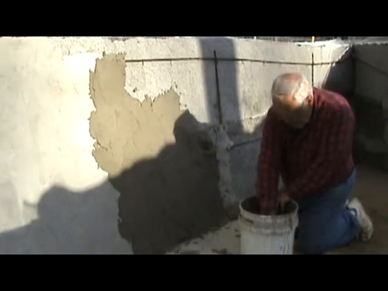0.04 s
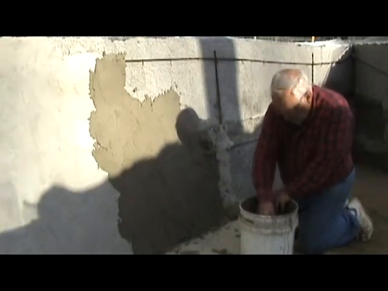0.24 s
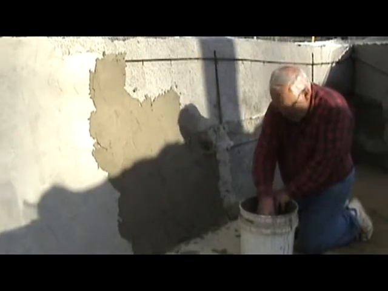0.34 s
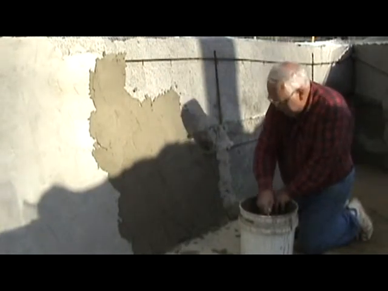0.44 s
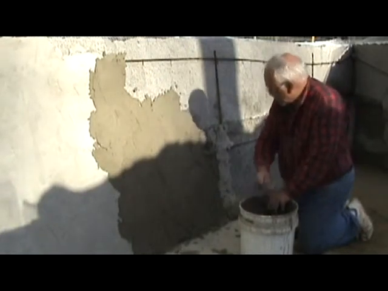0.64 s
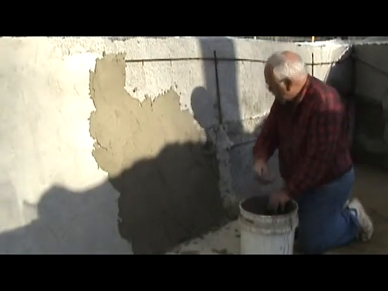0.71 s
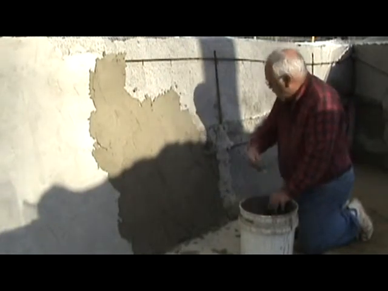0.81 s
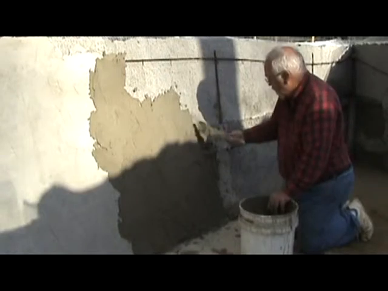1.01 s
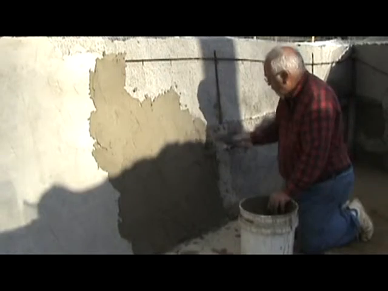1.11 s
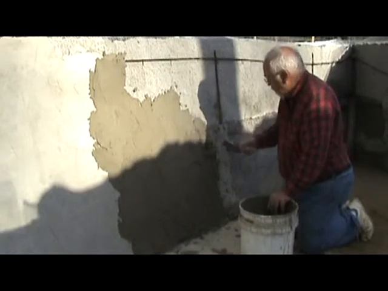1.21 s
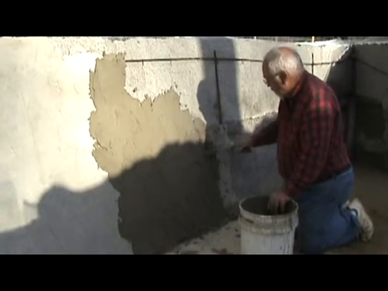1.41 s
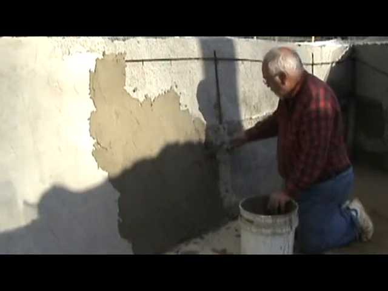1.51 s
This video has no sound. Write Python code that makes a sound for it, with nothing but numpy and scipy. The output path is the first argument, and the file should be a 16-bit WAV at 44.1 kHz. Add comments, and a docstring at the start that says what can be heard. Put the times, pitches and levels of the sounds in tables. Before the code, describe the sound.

In an outdoor yard with a low distant rumble, a trowel scrapes through gritty mortar, making the plastic bucket boom, and clatters on its way out. After a short pause, the mortar hits a wall with a wet slap.

```python
"""A walled yard outdoors, with a steady distant rumble, heard almost in mono.
A small trowel scoops wet mortar in a plastic bucket: grit scrapes under the blade, the push makes
the bucket's wall boom, and the blade clatters on the bucket as it is lifted out.
The load is then slapped onto a wall with a wet splat, a dull thud and a faint clink of the blade."""
import sys
import numpy as np
from scipy import signal
from scipy.fft import rfft, irfft, next_fast_len
from scipy.io import wavfile
from scipy.ndimage import map_coordinates

SR = 44100
rng = np.random.default_rng(int(sys.argv[2]) if len(sys.argv) > 2 else 0)


def int16_out(signal):
    """Quantize to a 16-bit WAV file."""
    q = np.round(np.clip(np.atleast_2d(signal).T, -1, 1) * 32767)
    wavfile.write(sys.argv[1], SR, q.astype(np.int16))


N = 68355
TIME = np.arange(N) / SR


def amp(db):
    """Decibels to gain."""
    return 10 ** (np.asarray(db) / 20)


def unit(x):
    """Scale to rms 1."""
    return x / np.sqrt(np.mean(x ** 2) + 1e-20)


def faders(rows):
    """One gain curve for each dB column of a timed table; silent outside the rows."""
    times, *columns = np.transpose(rows)
    return [amp(np.interp(TIME, times, db, left=-120, right=-120)) for db in columns]


def wobble(rate):
    """A smooth random curve with `rate` knots a second."""
    return map_coordinates(rng.standard_normal(2000), [TIME * rate], mode="wrap")


def filtered(x, response):
    """Shape x with a response given as a function of Hz."""
    size = next_fast_len(N + SR // 2)
    return irfft(rfft(x, size) * response(np.fft.rfftfreq(size, 1 / SR)), size)[..., :N]


def eq(x, curve):
    """Pass x through a (Hz, dB) curve on a log frequency axis."""
    freqs, db = np.transpose(curve)
    return filtered(x, lambda hz: amp(np.interp(np.log(hz + 1), np.log(freqs + 1), db)))


def noise(curve):
    """Smooth coloured noise, rms 1."""
    return unit(eq(rng.standard_normal(N), curve))


def grit(curve, grains_per_s, spread_db, hiss):
    """Sand-grain clicks of uneven size over smooth hiss, rms 1."""
    clicks = (rng.random(N) < grains_per_s / SR) * rng.choice([-1, 1], N)
    sizes = amp(spread_db * np.minimum(rng.exponential(size=N), 3))
    return unit(eq(unit(clicks * sizes) + hiss * rng.standard_normal(N), curve))


def burst(start, attack, t60):
    """Envelope of a hit: a quick rise and an exponential decay, all times in seconds."""
    age = np.maximum(TIME - start, 0)
    return (1 - np.exp(-age / attack)) * np.exp(-np.log(1000) * age / t60)


def ring(modes, start, attack):
    """Damped modes struck together."""
    age = TIME - start
    return sum(amp(db) * np.sin(2 * np.pi * hz * age) * burst(start, attack, t60)
               for hz, db, t60 in modes)


# The scoop's swell. Each row: time in seconds, rasp level in dB, sandy treble level in dB.
SCOOP_LEVELS = [(.17, -61, -56), (.2, -41.5, -47), (.232, -32, -37), (.272, -36, -48.5), (.31, -33, -46),
                (.337, -26.5, -39.5), (.356, -35.5, -49), (.39, -45.5, -57), (.43, -59, -55)]
# Tone of the midrange rasp and of the sandy top. Each row: frequency in Hz, gain in dB.
RASP_EQ = [(260, -43), (450, -9.5), (596, -7.5), (672, -9), (782, -3), (930, -12), (1250, -4.5),
           (1370, -11), (1500, 0), (2310, -8.5), (3100, -5), (4060, -18), (6000, -23.5), (7800, -36),
           (13200, -120)]
SAND_EQ = [(2500, -8.5), (4500, -1.5), (6000, -3), (8300, -1), (10000, -9.5), (13000, -16.5), (16000, -29)]

def scoop():
    """The blade drags through the gritty mix in small uneven slips."""
    rasp_level, sand_level = faders(SCOOP_LEVELS)
    slips = amp(1.67 * wobble(150.3) - 1)
    rasp = rasp_level * slips * grit(RASP_EQ, grains_per_s=3500, spread_db=4, hiss=0.54)
    sand = sand_level * slips * grit(SAND_EQ, grains_per_s=1800, spread_db=3.5, hiss=0.47)
    return with_blade_ring(rasp, ring_db=-7) + sand


# The push on the bucket. Each row: time in seconds, drive of the lower and of the upper modes in dB.
PUSH_LEVELS = [(.205, -46, -44), (.225, -33, -31), (.265, -25.5, -28.5), (.315, -27.5, -32),
               (.338, -20.5, -24.5), (.384, -25.5, -31), (.4, -27, -48), (.43, -30, -54), (.46, -46, -62)]
# The plastic wall's modes. Each row: pitch in Hz, level in dB, 60 dB decay time in seconds.
BUCKET_MODES = [(165, -15, .2), (233, .3, .21), (277, 0, .05), (343, -14, .1), (366, -17, .12)]
# Tone of the wall flexing. Each row: frequency in Hz, gain in dB.
FLEX_EQ = [(60, -18), (140, -5), (260, -1), (380, -3), (500, -12), (900, -34)]

def bucket_boom():
    """The push feeds the wall's low modes, which beat into a judder; the lower ones ring on."""
    hardest_push_s, upper_from_hz = .337, 255
    flutter_db, wander_rad = .8, .15
    lower, upper = faders(PUSH_LEVELS)
    boom = amp(-11) * upper * noise(FLEX_EQ)
    for hz, db, t60 in BUCKET_MODES:
        decay = np.exp(-np.log(1000) / (t60 * SR))
        swing = signal.lfilter([1 - decay], [1, -decay], upper if hz > upper_from_hz else lower)
        level = amp(db + flutter_db * wobble(44))
        phase = 2 * np.pi * hz * (TIME - hardest_push_s) + wander_rad * wobble(36.4)
        boom += swing * level * np.sin(phase)
    return boom


# Blade hits on the bucket. Each row: start in seconds, crack level in dB, knock level in dB,
# the crack's 60 dB decay time in seconds.
BLADE_HITS = [(.442, -28.5, -9.5, 0.045), (0.4529, -22.5, -29, 0.038), (0.457, -24, -22.5, 0.039),
              (0.4671, -23, -37, 0.041), (0.477, -33.5, -48, 0.06), (0.493, -41, -44, 0.1),
              (.511, -35, -44, 0.081)]
# Tone of the crack. Each row: frequency in Hz, gain in dB.
CRACK_EQ = [(200, -4), (500, -9.5), (800, -0.5), (1100, -9), (2000, -2), (3000, 3), (4100, -11), (6500, -8),
            (9500, -16), (12000, -25), (16000, -35)]
# The hollow knock. Each row: pitch in Hz, level in dB, 60 dB decay time in seconds.
KNOCK_MODES = [(1333, -2.5, .033), (1465, -7.5, 0.02), (1640, -18, 0.013)]

def clatter():
    """The blade grazes the rim, then knocks and chatters on its way out; light hits are duller."""
    dull_cutoff_hz, bright_above_db = 6500, -30.5
    bright = noise(CRACK_EQ)
    dull = filtered(bright, lambda hz: 1 / np.sqrt(1 + (hz / dull_cutoff_hz) ** 2))
    graze = amp(-34.5) * burst(start=.4345, attack=0.0018, t60=0.088) * dull
    cracks, knocks = np.zeros((2, N))
    for start, crack_db, knock_db, t60 in BLADE_HITS:
        texture = bright if crack_db > bright_above_db else dull
        cracks += amp(crack_db) * burst(start, attack=0.00026, t60=t60) * texture
        knocks += amp(knock_db) * ring(KNOCK_MODES, start, attack=0.00085)
    return with_blade_ring(graze + cracks, ring_db=-7) + knocks


# Wet mortar landing. Each row: start in seconds, level in dB, attack and 60 dB decay time in seconds.
SPLAT_HITS = [(1.0545, -37, 0.00079, .06), (1.059, -30.5, 0.0013, 0.049), (1.0627, -29, 0.00064, 0.019),
              (1.069, -36, .003, 0.15)]
# Tone of the splat, the punch and the load spreading out. Each row: frequency in Hz, gain in dB.
SPLAT_EQ = [(300, 6.5), (550, 8), (900, -6.5), (1150, -6), (1380, 0), (1700, -3), (2400, -5.5), (3100, -1),
            (3900, -4), (5000, -2), (8500, -7), (12000, -18), (16000, -25)]
PUNCH_EQ = [(40, -20), (120, -3), (300, 0.5), (700, -1), (3000, -12)]
SQUASH_EQ = [(80, -33), (170, 8.5), (280, 2), (420, -10), (560, -6), (750, -29), (1500, -50)]
# The dull thud, and the clink of the blade meeting the wall.
# Each row: pitch in Hz, level in dB, 60 dB decay time in seconds.
THUD_MODES = [(160.4, 0.5, 0.25), (227.5, -1.5, 0.26), (272, -4.5, 0.13), (314, -3.5, 0.16), (412, -9, .18),
              (514, -7, 0.19)]
CLINK_MODES = [(1394, -1, 0.16), (3000, -2, 0.076), (3300, -2, .06), (4410, -4, .07), (5000, 0, .045)]

def slap():
    """The load splats on the wall, stops with one punch, thuds and spreads; the blade rings faintly."""
    impact_s, pulse_width_s = 1.0646, 0.00067
    thud_s, thud_attack_s = 1.066, 0.0095
    spray = sum(amp(db) * burst(start, attack, t60) for start, db, attack, t60 in SPLAT_HITS)
    wet_grit = grit(SPLAT_EQ, grains_per_s=6000, spread_db=3, hiss=0.77)
    splat = with_blade_ring(spray * wet_grit, ring_db=-16)
    pulse = -amp(-19) * np.exp(-np.abs(TIME - impact_s) / pulse_width_s)
    punch = eq(pulse, PUNCH_EQ)
    clink = amp(-41.5) * ring(CLINK_MODES, impact_s, attack=.0003)
    squash = amp(-27.5) * burst(thud_s, thud_attack_s, t60=0.29) * noise(SQUASH_EQ)
    thud = amp(-27) * ring(THUD_MODES, thud_s, thud_attack_s)
    return splat + punch + clink + squash + thud


# Resonances of blade and bucket. Each row: pitch in Hz, level in dB, 60 dB decay time in seconds.
BLADE_MODES = [(791.6, -9, 0.18), (1263, 3.5, 0.096), (1350, -2, 0.092), (1379, 0, .12), (1510, -6, 0.1),
               (1718, -8, 0.13), (2170, -12, 0.075), (2620, -8, .08), (2714, -22, .08), (3002, -12, .08),
               (3060, -11, 0.072), (3410, -13, 0.083)]

def with_blade_ring(contact, ring_db):
    """A contact sound plus the ringing it excites, ring_db relative to its own level."""
    ringing = signal.fftconvolve(contact, ring(BLADE_MODES, start=0, attack=0.00065))[:N]
    return contact + amp(ring_db) * unit(ringing) * np.std(contact)


# The hollow rub's swell. Each row: time in seconds, level in dB.
RUB_LEVELS = [(.19, -67), (.24, -46), (.3, -41), (.345, -37), (.39, -43.5), (.43, -52), (.5, -44),
              (.57, -56.5)]
# Its tone. Each row: frequency in Hz, gain in dB.
RUB_EQ = [(300, -5), (450, -14), (610, -1), (860, 0), (1000, 0), (1250, -11), (1550, -4), (2200, -16),
          (4000, -48)]

def mortar_rub():
    """Heavy mortar rubs round the inside of the bucket and settles."""
    level, = faders(RUB_LEVELS)
    return level * grit(RUB_EQ, grains_per_s=500, spread_db=2, hiss=0.88)


# The sliding hiss's swell. Each row: time in seconds, level in dB.
SLIDE_LEVELS = [(0, -53), (.08, -54), (.17, -58), (.22, -63), (.97, -72), (1.025, -51.5), (1.05, -53.5),
                (1.08, -75)]
# Its tone. Each row: frequency in Hz, gain in dB.
SLIDE_EQ = [(700, -10), (1300, 4), (2200, -7.5), (4000, -1.5), (5500, 4.5), (7500, -2), (10300, -5),
            (12000, -12), (16000, -20)]

def mortar_slide():
    """Mortar hisses faintly along the blade before the scoop and before the slap."""
    level, = faders(SLIDE_LEVELS)
    return level * grit(SLIDE_EQ, grains_per_s=3000, spread_db=1.5, hiss=0.96)


def yard_reflections(x):
    """A short diffuse answer from the surrounding walls."""
    tail = rng.standard_normal(N) * burst(start=0.0058, attack=0.00092, t60=0.098)
    return signal.fftconvolve(x, tail / np.linalg.norm(tail))[:N]


# Tone of the outdoor bed. Each row: frequency in Hz, gain in dB.
RUMBLE_EQ = [(12, -28), (20, 2), (38, -5), (65, -5.5), (88, 2), (113, -7.5), (150, -1.5), (337, -9),
             (399, -9), (499, -11.5), (574, -10.5), (976, -14), (1060, -17), (1400, -19), (1660, -22.5),
             (4670, -26.5), (16000, -47.5)]

def distant_rumble():
    """Steady outdoor air: a low rumble with a faint hiss on top."""
    return amp(-44.5) * noise(RUMBLE_EQ)


# Stereo width across the spectrum. Each row: frequency in Hz, side-channel gain in dB.
SIDE_EQ = [(30, -31), (125, -20), (300, -12), (650, -6.5), (1500, -8.5), (4500, -12), (8500, -14),
           (12000, -42)]

def scene():
    """The trowel work sits in the middle; reflections and outdoor air give a little width."""
    work = scoop() + mortar_rub() + clatter() + slap() + mortar_slide()
    mid = work + amp(-15.5) * yard_reflections(work) + distant_rumble()
    side = eq(amp(-3) * yard_reflections(work) + amp(-2.5) * distant_rumble(), SIDE_EQ)
    boom_phase_rad = np.array([[0.23], [-0.23]])  # the boom reaches the left slightly earlier
    boom = filtered(bucket_boom(), lambda hz: np.exp(1j * boom_phase_rad))
    return np.array([mid + side, mid - side]) + boom


def record(dry):
    """A brick-wall low-pass trims the very top."""
    return filtered(dry, lambda hz: hz < 16050)


dry = scene()
out = record(dry)
int16_out(out)
```